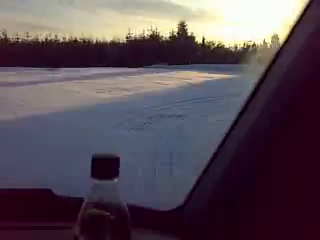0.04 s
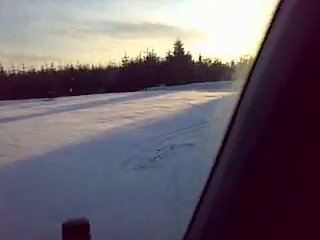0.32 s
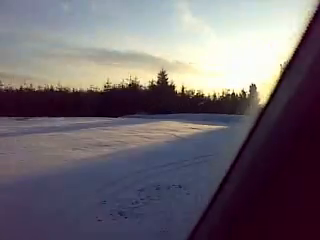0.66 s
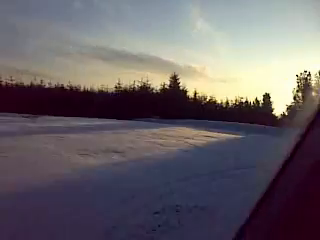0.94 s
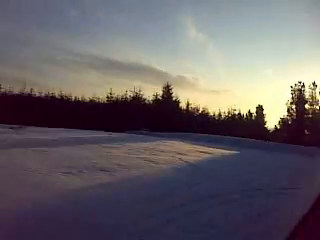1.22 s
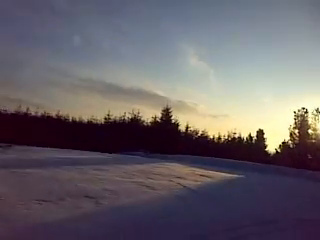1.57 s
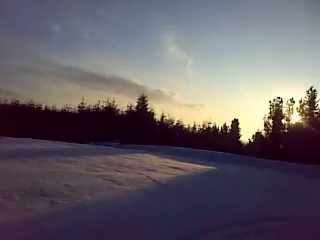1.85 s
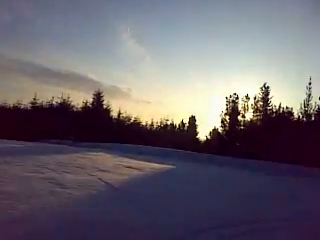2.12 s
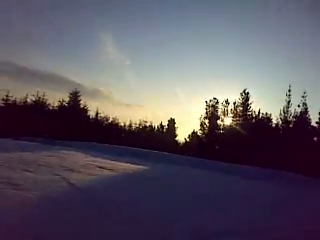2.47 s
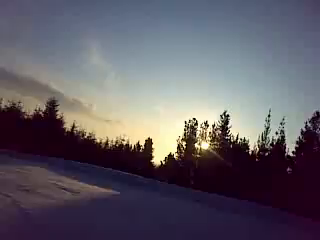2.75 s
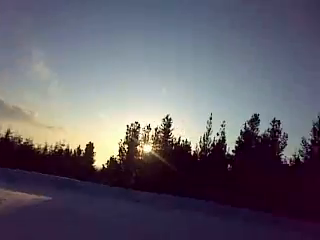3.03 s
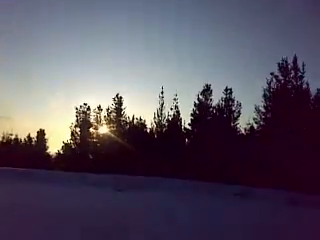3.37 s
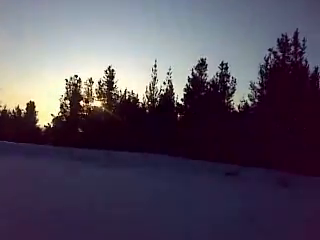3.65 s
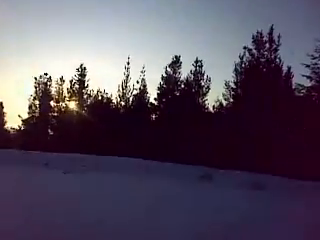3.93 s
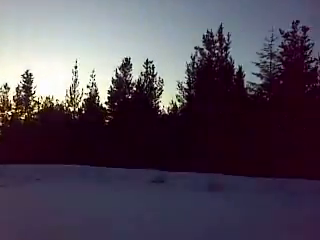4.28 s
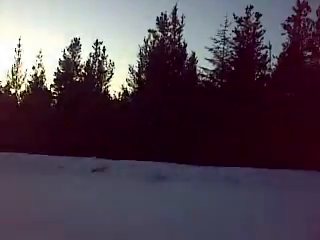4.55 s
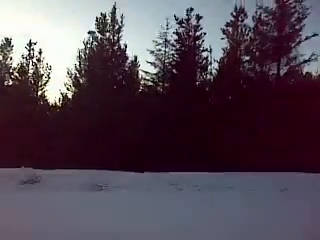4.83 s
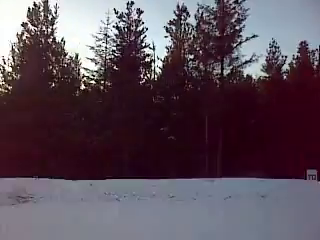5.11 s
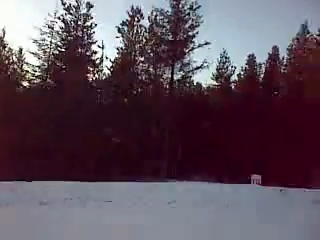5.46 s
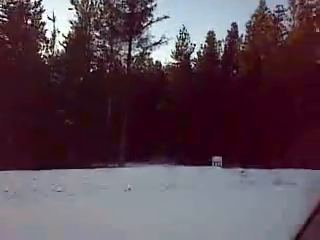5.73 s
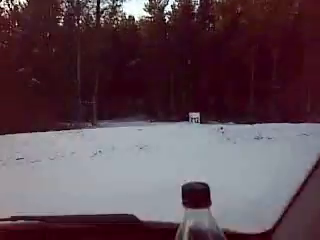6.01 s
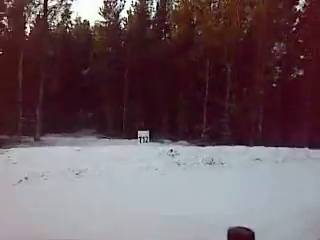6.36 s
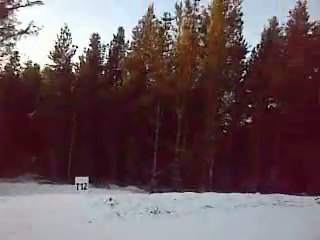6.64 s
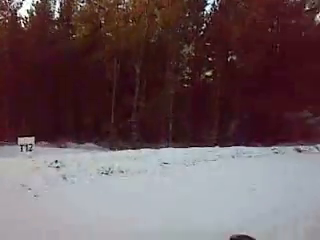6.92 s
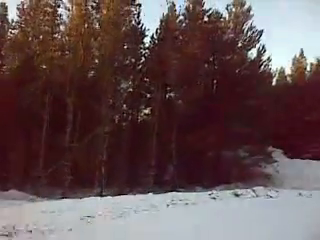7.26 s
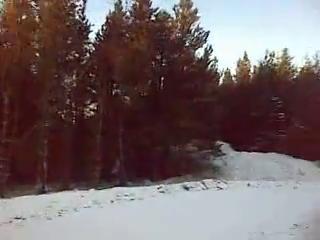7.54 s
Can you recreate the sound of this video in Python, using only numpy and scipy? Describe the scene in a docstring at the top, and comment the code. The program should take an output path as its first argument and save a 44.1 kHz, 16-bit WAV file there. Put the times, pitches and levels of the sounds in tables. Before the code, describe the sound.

Inside a car moving over packed snow, a deep cabin rumble runs for the whole stretch of nearly eight seconds, swelling and dipping with the uneven track. A low engine hum, a softer tyre roar and a faint hiss blend into it. From the very start the turn indicator goes tick-tock in the dashboard, about three light clicks a second, and keeps going to the end. Dull suspension thumps come in a cluster from 0.6 to 2 seconds, then at 3.1, between 5 and 5.5, and at 6.7. Loose things make short plastic knocks, the clearest at about 0.35 seconds, with lighter ones around 1, 3, 5 to 5.5 and after 6 seconds. Faint ticks and scuffs are scattered among them. Between about 6.4 and 7.5 seconds there are a few very faint, high squeaks. Everything is heard close, from the front seat.

```python
"""Inside a car turning on packed snow. The uneven track shakes the body and makes the cabin boom
over a low engine hum, while the tyres roar and hiss. The indicator relay snaps shut and open,
going tick-tock in the dashboard, and now and then a rut thumps the suspension.
There are short plastic-sounding knocks, and loose things tick, scuff and squeak faintly."""
import sys
import numpy as np
from scipy import signal
from scipy.fft import rfft, irfft, next_fast_len
from scipy.io import wavfile
from scipy.ndimage import uniform_filter1d, map_coordinates

SR = 44100
rng = np.random.default_rng(int(sys.argv[2]) if len(sys.argv) > 2 else 0)


def store_wav(level_fs):
    """Save 16-bit WAV to argv[1]."""
    pcm = np.round(np.clip(np.atleast_2d(level_fs), -1, 1) * 32767)
    wavfile.write(sys.argv[1], SR, pcm.T.astype(np.int16))


N = 339129

# The tone colour of each noise. Each row: frequency in Hz, relative level in dB.
SHAKE_COLOUR = [(7, -40), (12, -11.5), (19, 2.5), (26, -10), (34, -2), (47, -12), (60, -16.5), (90, -40.5)]  # the car body
BOOM_COLOUR = [(40, -47), (60, -4.5), (77, 4.5), (95, -1), (125, 0), (160, -6), (200, -17), (300, -50)]  # the cabin air
DRONE_COLOUR = [(110, -21.5), (175, -0.5), (200, -1.5), (260, -6.5), (340, -12.5), (450, -20), (700, -24)]  # the panels
ROAR_COLOUR = [(200, 1), (330, 1.5), (410, 3.5), (450, 1.5), (490, 2.5), (590, -1.5), (680, 3.5), (780, 0),
               (875, 2), (960, -1), (1500, -5), (1850, -7.5), (2130, -8.5), (2260, -15), (3250, -21.5),
               (4000, -30), (8000, -68)]  # the tyre tread
HISS_COLOUR = [(1500, 0.5), (3500, 3.5), (5200, 2.5), (7000, 0), (9000, -3), (14000, -1)]  # the snow
TRIM_COLOUR = [(500, -24), (1000, 9), (1500, 0.5), (2000, -3), (2700, -5.5), (3350, -5), (3800, -23),
               (6500, -25), (7600, -17.5), (9000, -38)]  # the dashboard around the relay
KNOCK_COLOUR = [(400, 3.5), (900, 2.5), (1400, 7), (2000, 1.5), (2600, -4.5), (3300, -12.5), (4500, -18),
                (7000, -20.5), (12000, -40)]  # the plastic-sounding knocks
# Brief swells and dips in the low rumble. Each row: middle and spread in seconds, then the dB added
# to the shake, the boom and the drone.
RUMBLE_SWELLS = [(0.116, 0.019, 4, 3.5, 3.5), (0.685, 0.045, 3, 3, 1), (0.93, 0.016, 1, -5, 1.5),
                 (1.155, 0.034, -16, -8, -4), (1.4, 0.066, 5.5, 7.5, 4.5), (1.56, .025, 3, -3.5, -3.5),
                 (2.123, 0.065, 1, -1, -3), (2.414, 0.027, 7.5, 3, 5), (2.63, 0.025, 0, 2, -0.5),
                 (2.723, 0.031, 4.5, -1.5, 0.5), (2.88, 0.027, -5, -5, -4.5), (2.965, 0.019, 1.5, -11, 1),
                 (3.095, 0.062, 7.5, 2.5, 3.5), (3.4, 0.12, 2.5, 2, 1), (3.593, 0.024, -0.5, -9, -2),
                 (4.826, 0.021, 1.5, -3, 3.5), (5.02, 0.05, 8, 7, 2.5), (5.54, 0.025, -11.5, 4.5, 1.5),
                 (5.79, 0.077, 5, 3.5, 0), (5.993, 0.031, 1, -10, -4), (6.33, 0.12, 4.5, 6, 3.5),
                 (6.603, .035, -0.5, -2, -4), (6.69, 0.029, -2, 5, 1.5), (6.953, 0.048, 7.5, -3.5, -1.5),
                 (7.18, 0.026, -7.5, -3, -5.5), (7.294, .02, 1.5, -8, -3), (7.568, 0.13, 6.5, 0.5, 0.5)]
# How hard the engine pulls. Each row: time in seconds, relative level of the hum in dB.
ENGINE_PULL = [(0, -37.5), (.13, -28.5), (.27, -52), (1.6, -44.5), (2.1, -40), (2.55, -36), (3.45, -38.5),
               (3.6, -44), (3.85, -39), (4.2, -48), (4.8, -49), (4.9, -36), (5.17, -32.5), (5.9, -43),
               (6.14, -34), (6.55, -37), (7.1, -34), (7.3, -47), (7.69, -44)]
# Faint drivetrain tones. Each row: pitch in Hz, level in dB, middle and spread in seconds.
DRIVETRAIN_TONES = [(205, -44, 5.8, 0.14), (424, -64, 2.07, 0.95), (244.6, -52.5, 5.28, 0.085),
                    (872, -67, 1.8, 1)]
# Tyres on snow. Each row: time in seconds, relative levels of the roar and the hiss in dB.
TYRE_LEVELS = [(0.0, -51, -69.5), (0.92, -52.5, -71.5), (1.12, -50, -70.5), (1.3, -52, -70),
               (1.85, -52, -70), (2.21, -53.5, -73), (2.85, -53.5, -73), (2.96, -52.5, -73),
               (3.23, -53.5, -70.5), (3.75, -52.5, -73.5), (4.3, -53, -73), (4.82, -51.5, -72),
               (5.15, -53, -73), (5.6, -51.5, -73.5), (5.98, -54.5, -74.5), (6.3, -53, -73.5),
               (7.15, -54, -74.5), (7.69, -54, -73.5)]
# The ringing tones of the relay and dashboard. Each row: pitch in Hz, relative levels on closing
# and on opening in dB, seconds to fade by 60 dB (called t60 below).
RELAY_TONES = [(764, -8, 1.5, 0.062), (954, 3, 1.5, 0.037), (1055, -6, 2.5, 0.062),
               (1117, 1.5, -0.5, 0.076), (1250, -6, 0.5, 0.097), (1517, -11, -4.5, 0.059),
               (1725, -5, -1.5, 0.055), (1890, -2, -8, 0.056), (2002, -6, -0.5, 0.066),
               (2392, 0.5, -3, 0.036), (2790, -5.5, -13, 0.061), (3160, -6, -24, 0.043),
               (3320, -5.5, -24, 0.039), (7560, -15, -28, .02)]
# Blows to the suspension. Each row: start in seconds, level in dB, pitch in Hz.
SUSPENSION_BLOWS = [(0.598, -21, 165), (.632, -32, 290), (.757, -23, 130), (.984, -19.5, 145),
                    (1.283, -22, 152), (1.607, -28, 148), (2.051, -20, 155.5), (3.085, -19, 79.4),
                    (5.02, -27, 129), (5.322, -18.5, 165.6), (5.52, -23, 80), (6.685, -25, 90)]
# Short plastic-sounding knocks; the first is part of the relay's louder first tick.
# Each row: start in seconds, relative level in dB, t60 in seconds.
SHORT_KNOCKS = [(.031, -49, .07), (0.047, -46.5, 0.046), (0.133, -49.5, 0.17), (0.183, -46, 0.04),
                (0.3457, -39.5, 0.07), (0.354, -42, 0.15), (.558, -52, .05), (1.047, -47, .035),
                (3.083, -53.5, 0.13), (3.151, -51, .015), (4.888, -49, 0.083), (5.259, -52.5, 0.055),
                (5.341, -52.5, 0.15), (5.473, -50, .16), (6.096, -48, .025), (6.278, -53.5, .14),
                (6.698, -55, 0.3), (7.246, -50, .08)]
# Small hard things touching. Each row: start in seconds, level in dB, centre frequency in Hz.
HARD_TOUCHES = [(.3455, -55, 8500), (.608, -57, 6200), (3.1515, -56, 4400), (5.473, -54, 7500),
                (5.478, -53, 5200), (6.106, -56, 5200)]
# The tone colour of a touch. Each row: multiple of the centre frequency, relative level in dB.
TOUCH_COLOUR = [(.4, -22), (.8, -3), (1.05, -2), (1.4, -13), (2.6, -26)]
# Light things sliding. Each row: loudest moment in seconds, level in dB, rise and fall in seconds,
# centre frequency in Hz, width in octaves.
SLIDES = [(0.348, -57, 0.002, 0.01, 4000, .8), (1.085, -62.5, 0.094, .065, 3200, 1.2),
          (1.405, -67, .018, .018, 6500, 0.48), (2.43, -59, 0.035, 0.065, 1400, 0.73),
          (3.054, -62, 0.009, .018, 9500, 1.3), (3.331, -66, 0.07, 0.069, 3300, 0.98),
          (3.398, -62, 0.007, .015, 7000, 1.2), (4.604, -62.5, 0.007, .016, 5200, 1.4),
          (4.675, -67, .01, .016, 8000, .9), (4.89, -61, 0.009, .017, 6010, 1),
          (5.045, -69, 0.015, .04, 5600, 0.71), (5.476, -55, 0.0068, 0.015, 6400, 1.15),
          (5.519, -64.5, 0.01, .022, 4800, 0.8), (6.668, -60, 0.007, 0.018, 4100, 1),
          (6.697, -60.5, 0.0091, .02, 5500, 0.93), (7.477, -55.5, 0.005, 0.016, 8000, 2.2)]
# Parts squeaking. Each row: loudest moment in seconds, level in dB, spread in seconds,
# pitch and width in Hz.
SQUEAKY_RUBS = [(6.385, -68, .013, 4300, 150), (6.382, -64.5, .017, 5100, 320),
                (6.378, -71, .011, 6900, 280), (6.725, -69, .02, 7220, 170), (6.715, -69, .018, 9070, 80),
                (6.766, -60, 0.014, 8400, 25), (6.82, -72, .016, 8400, 25), (7.145, -74, 0.022, 5000, 280),
                (7.454, -62.5, 0.013, 8420, 60)]


def body(shake_db=-30, boom_db=-39, drone_db=-48, jostles_per_s=12):
    """The uneven track shakes the body, the cabin air booms and the panels drone."""
    def rumble(db, colour, jostle_db, span_s, share):
        gain = amp(db + jostle_db * wobble(jostles_per_s))  # small bumps jostle the level
        return gain * steady(noise(colour), span_s, share)

    shake_lift, boom_lift, drone_lift = rumble_lift()
    shake = rumble(shake_db + shake_lift, SHAKE_COLOUR, jostle_db=2.5, span_s=0.12, share=0.93)
    boom = rumble(boom_db + boom_lift, BOOM_COLOUR, jostle_db=2.5, span_s=0.1, share=1)
    drone = rumble(drone_db + drone_lift, DRONE_COLOUR, jostle_db=2, span_s=0.09, share=0.23)
    return shake + boom + drone


def rumble_lift():
    """Three curves in dB that make the shake, the boom and the drone briefly swell and dip."""
    return sum(np.outer(lifts, bell(clock() - s, spread)) for s, spread, *lifts in RUMBLE_SWELLS)


def engine(firing_hz=78.9, wander_hz=1.0, lift_share=0.44):
    """The engine's firing makes a slightly unsteady hum; faint drivetrain tones swell and fade."""
    t = clock()
    pull_db, = curves(ENGINE_PULL)
    _, boom_lift, _ = rumble_lift()
    pitch = firing_hz + wander_hz * wobble(1.5)
    phase = 2 * np.pi * np.cumsum(pitch) / SR + 0.98 * wobble(10)
    hum_db = pull_db - 4 + lift_share * boom_lift + 4.1 * wobble(9)
    hum = amp(hum_db) * (np.sin(phase) + amp(-23.5) * np.sin(2 * phase))
    for hz, db, middle, spread in DRIVETRAIN_TONES:
        swell = amp(db + 2.6 * wobble(7)) * bell(t - middle, spread)
        hum += swell * np.sin(2 * np.pi * hz * t + 0.9 * wobble(8))
    return np.sqrt(2) * hum


def tyres(lift_share=0.31):
    """The tread roars and hisses: crumbling lumps add grain, and changing snow shifts the colour."""
    roar_db, hiss_db = curves(TYRE_LEVELS)
    *_, drone_lift = rumble_lift()
    lumps = wobble(35)
    roar_gain = amp(roar_db - 0.28 + lift_share * drone_lift + 0.5 * lumps + 0.81 * wobble(160))
    roar = roar_gain * patchy(noise(ROAR_COLOUR), depth_db=1.2)
    hiss_gain = amp(hiss_db + 2.5 + 0.46 * lumps + 0.57 * wobble(300))
    hiss = hiss_gain * patchy(noise(HISS_COLOUR), depth_db=1.35)
    return roar + hiss


def relay(first_s=0.029, blink_s=0.6889, closed_s=0.324, scatter_db=0.5):
    """The relay's little arm snaps shut and open once a blink, bouncing once each time it lands."""
    out = np.zeros(N)
    hz, closing_db, opening_db, t60 = np.transpose(RELAY_TONES)[:, :, None]

    def land(s, tone_db, db, trim_db, bounce_s, bounce_db):
        gain = amp(db + scatter_db * rng.standard_normal())
        add(out, s, gain * snap(hz, tone_db, t60, trim_db))
        add(out, s + bounce_s, amp(db + bounce_db) * snap(hz, tone_db, t60, trim_db))

    blinks = np.arange(first_s, N / SR, blink_s)
    blinks[blinks > 6] += 0.01  # the flasher hesitates once, delaying all later blinks
    for s in blinks:
        land(s, closing_db, db=-42.8, trim_db=-4.8, bounce_s=0.016, bounce_db=-10.5)
        land(s + closed_s, opening_db, db=-42.5, trim_db=-7.8, bounce_s=0.0095, bounce_db=-7)
    return out


def snap(hz, tone_db, t60, trim_db, trim_t60=0.12, attack_s=0.00057, detune=0.0075):
    """One landing of the arm rings the relay and the dashboard trim, never quite the same way twice."""
    t = np.arange(SR // 6) / SR
    pitch = hz * (1 + detune * rng.standard_normal(hz.shape))
    gains = amp(tone_db - 8.7 + 1.3 * rng.standard_normal(hz.shape))
    tones = gains * decay(t, t60) * np.sin(2 * np.pi * (pitch * t + rng.random(hz.shape)))
    trim = amp(trim_db) * decay(t, trim_t60) * noise(TRIM_COLOUR, len(t))
    return onset(t, attack_s) * (tones.sum(axis=0) + trim)


def thumps(upper_ratio=1.5, upper_db=-5, ring_cycles=10, attack_s=0.0047):
    """A rut knocks the suspension, and the floor rings briefly at two pitches."""
    out, t = np.zeros(N), np.arange(SR // 4) / SR
    for s, db, hz in SUSPENSION_BLOWS:
        phase = 2 * np.pi * hz * t
        ring = np.sin(phase) + amp(upper_db) * np.sin(upper_ratio * phase)
        add(out, s, amp(db) * onset(t, attack_s) * decay(t, ring_cycles / hz) * ring)
    return out


def knocks(attack_s=0.0014, faint_db=-58.5, faint_t60=0.066):
    """Plastic-sounding knocks, each a burst of noise that dies quickly; fainter ones come at random."""
    out, t = np.zeros(N), np.arange(SR // 5) / SR
    faint = [(s, faint_db, faint_t60) for s in random_times(per_s=0.56)]
    for s, db, t60 in SHORT_KNOCKS + faint:
        add(out, s, amp(db + 3.5) * onset(t, attack_s) * decay(t, t60) * noise(KNOCK_COLOUR, len(t)))
    return out


def ticks(crack_t60=0.0061, ring_db=-10, ring_t60=0.05):
    """Small hard things touch: a sharp crack and a brief bright ring."""
    out, t = np.zeros(N), np.arange(SR // 10) / SR
    fade = decay(t, crack_t60) + amp(ring_db) * decay(t, ring_t60)
    for s, db, hz in HARD_TOUCHES:
        colour = [(hz * ratio, level) for ratio, level in TOUCH_COLOUR]
        add(out, s, amp(db) * fade * noise(colour, len(t)))
    return out


def scuffs(slips_per_s=1000, slip_share=0.43, catches_per_s=260):
    """Light things slide in tiny uneven slips; fainter slides come at random."""
    out, t = np.zeros(N), np.arange(-SR // 5, SR // 5) / SR
    octave = np.log2(np.fft.rfftfreq(len(t), 1 / SR) + 1)
    faint = [(s, -75, 0.008, 0.008, 6000, 0.6) for s in random_times(per_s=0.6)]  # rows as in SLIDES
    for s, db, rise, fall, hz, width in SLIDES + faint:
        slips = unit((rng.random(len(t)) < slips_per_s / SR) * rng.choice([-1, 1], len(t)))
        rub = np.sqrt(slip_share) * slips + np.sqrt(1 - slip_share) * rng.standard_normal(len(t))
        catches = amp(wobble(catches_per_s)[:len(t)])
        rub = patchy(rub * catches, depth_db=3)
        rub = filtered(rub, bell(octave - np.log2(hz), width))
        swell = bell(t, np.where(t < 0, rise, fall))
        add(out, s + t[0], amp(db) * swell * rub)
    return out


def squeaks():
    """Rubbing parts sing briefly around one pitch: a narrow band whistles, a wide one rasps."""
    out, t = np.zeros(N), np.arange(-SR // 10, SR // 10) / SR
    freq = np.fft.rfftfreq(len(t), 1 / SR)
    for s, db, spread, hz, width in SQUEAKY_RUBS:
        song = filtered(rng.standard_normal(len(t)), bell(freq - hz, width))
        add(out, s + t[0], amp(db) * bell(t, spread) * steady(song, span_s=0.004, share=0.85))
    return out


def amp(db):
    """Turn decibels into a gain to multiply by."""
    return 10 ** (np.asarray(db) / 20)


def unit(x):
    """Scale a sound to an average power of 1."""
    return x / np.sqrt(np.mean(x ** 2) + 1e-20)


def clock():
    """The time of every sample in seconds."""
    return np.arange(N) / SR


def bell(x, spread):
    """A smooth hill that peaks where x is 0."""
    return np.exp(-0.5 * (x / spread) ** 2)


def onset(t, attack_s):
    """A quick rise from 0 towards 1."""
    return 1 - np.exp(-t / attack_s)


def decay(t, t60):
    """A fade that drops 60 dB every t60 seconds."""
    return amp(-60 * t / t60)


def curves(rows):
    """Join a table's rows with straight lines: one curve for each column after the time."""
    times, *columns = np.transpose(rows)
    return [np.interp(clock(), times, column) for column in columns]


def wobble(per_s):
    """A smooth curve through per_s random values a second."""
    values = rng.standard_normal(4096)
    coarse = clock()[::32]
    return np.interp(clock(), coarse, map_coordinates(values, [coarse * per_s], mode="wrap"))


def random_times(per_s):
    """Moments scattered over the scene, about per_s a second."""
    times = np.cumsum(rng.uniform(0, 2, 64)) / per_s
    return times[times < N / SR]


def noise(colour, size=N):
    """Noise shaped by a tone colour table."""
    padded = next_fast_len(size)
    hz, db = np.transpose(colour)
    log_freq = np.log(np.fft.rfftfreq(padded, 1 / SR) + 1)
    gain = amp(np.interp(log_freq, np.log(hz), db, left=-120, right=-120))
    return unit(irfft(rfft(rng.standard_normal(padded)) * gain, padded)[:size])


def filtered(x, gain):
    """Give each frequency its own gain, then scale to a power of 1."""
    return unit(irfft(rfft(x) * gain, len(x)))


def steady(x, span_s, share):
    """Flatten a share of a noise's own swells that last longer than span_s."""
    power = np.abs(uniform_filter1d(x ** 2, int(span_s * SR))) + 1e-6
    return unit(x / power ** (share / 2))


def patchy(x, depth_db, bands=4, frames=22):
    """Let each frequency band of a noise swell and fade on its own."""
    spectrum = signal.stft(x, nperseg=256)[2]
    swells = uniform_filter1d(rng.standard_normal(spectrum.shape), bands, axis=0)
    swells = unit(uniform_filter1d(swells, frames, axis=1))
    return unit(signal.istft(spectrum * amp(depth_db * swells), nperseg=256)[1][:len(x)])


def add(track, s, sound):
    """Mix a sound into a track, starting at s seconds."""
    start = max(round(s * SR), 0)
    part = track[start:start + len(sound)]
    part += sound[:len(part)]


def scene():
    """Everything as heard from the front seat, in one channel."""
    car = body() + engine() + tyres() + relay() + thumps()
    small_sounds = knocks() + ticks() + scuffs() + squeaks()
    return (car + small_sounds)[None]


def record(dry, top_hz=14350, fade_s=0.004):
    """Fade both ends quickly and cut off the highest treble."""
    padded = next_fast_len(N + SR // 2)
    fade = np.clip(np.minimum(clock(), clock()[::-1]) / fade_s, 0, 1)
    kept = np.fft.rfftfreq(padded, 1 / SR) < top_hz
    return irfft(rfft(dry * fade, padded) * kept, padded)[..., :N]


dry = scene()
out = record(dry)
store_wav(out)
```